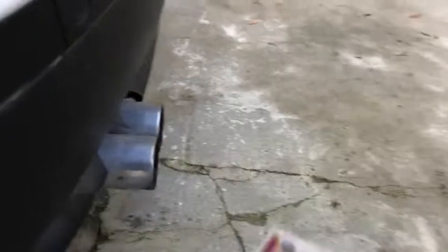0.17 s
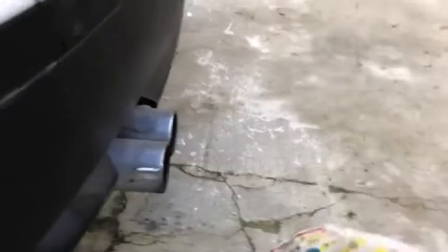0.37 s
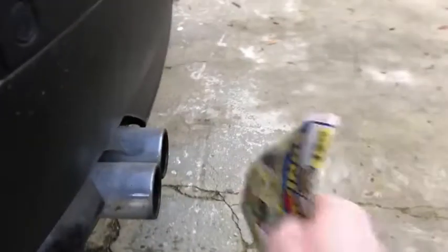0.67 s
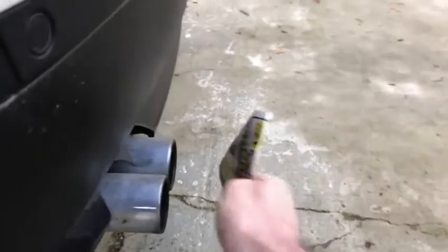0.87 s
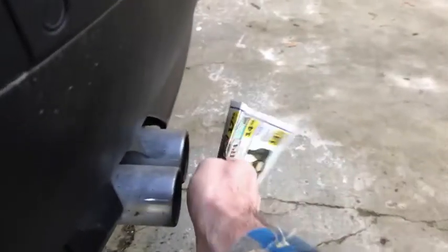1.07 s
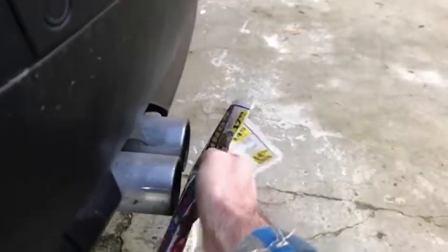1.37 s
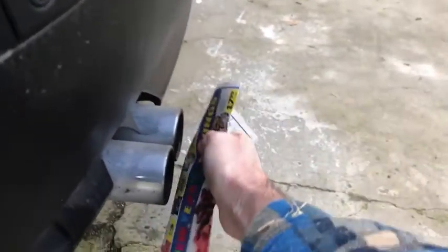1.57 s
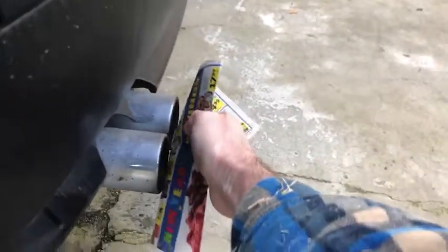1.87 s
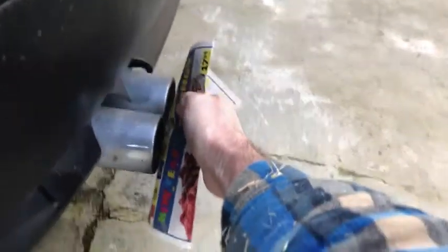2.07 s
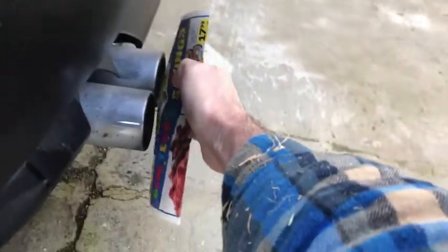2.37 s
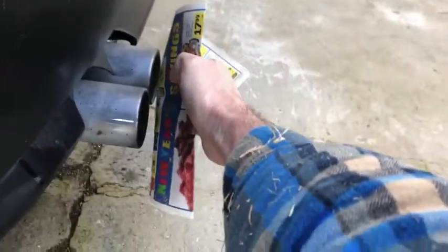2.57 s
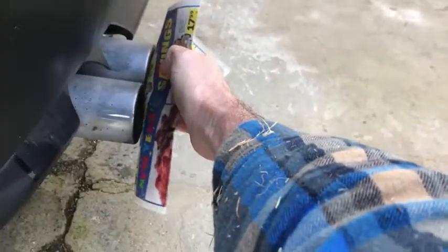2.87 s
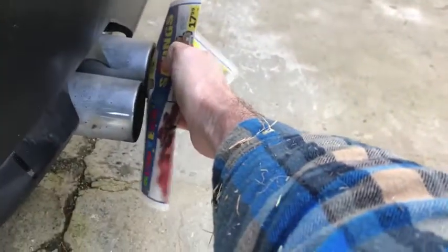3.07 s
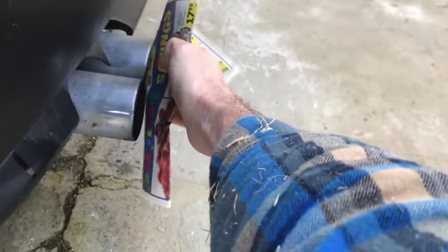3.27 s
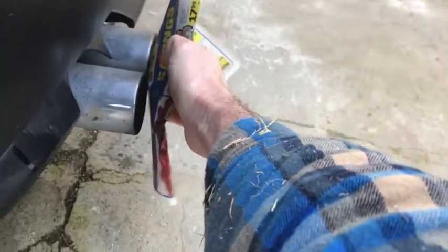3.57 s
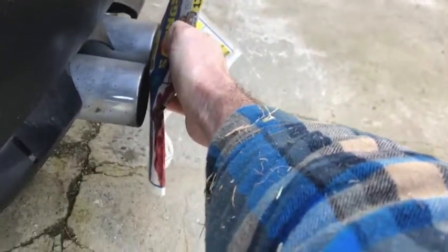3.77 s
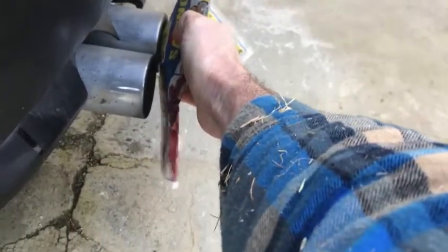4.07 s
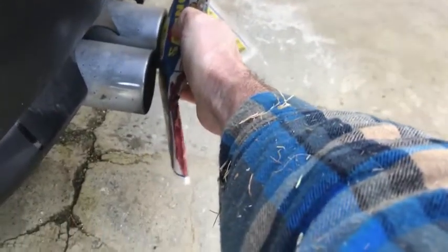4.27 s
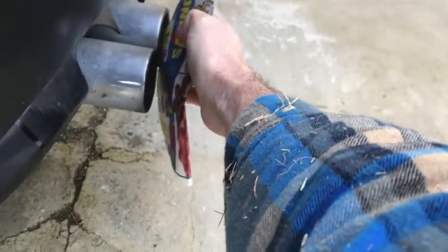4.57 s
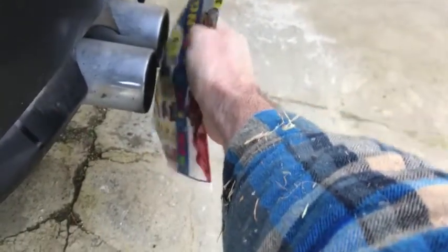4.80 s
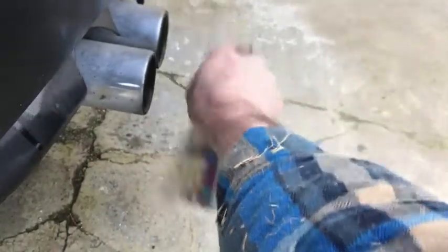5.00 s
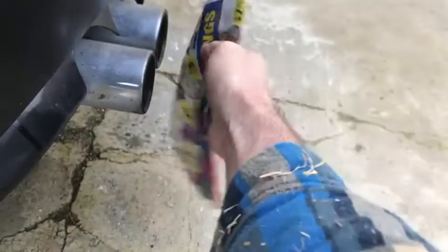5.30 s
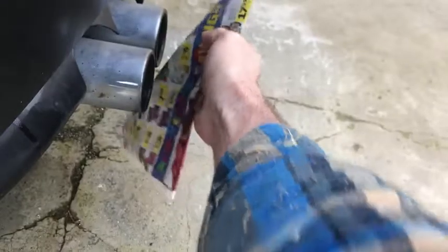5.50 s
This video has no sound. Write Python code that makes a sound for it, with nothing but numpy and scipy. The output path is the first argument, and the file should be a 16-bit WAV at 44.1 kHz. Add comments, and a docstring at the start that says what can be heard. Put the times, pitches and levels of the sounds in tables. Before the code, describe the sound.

Deep, uneven exhaust pulsing from an idling car, with soft misfire thumps and a paper flyer snapping, swishing and faintly crinkling.

```python
"""A V12 idles outdoors at about 690 rpm, close to its tailpipes: firing pulses ring the exhaust in a
deep, lumpy throb, with a rush of gas and faint valve clatter. Right away a folded paper flyer is
snatched up with sharp taps and a swish. All along, one cylinder misfires now and then and sucks gas
back with a bump. Held to the pipes, the flyer crinkles at about two seconds and again near the end,
by which time the microphone has closed in and the gas is a little louder."""
import sys
import numpy as np
from scipy import signal
from scipy.fft import rfft, irfft, next_fast_len
from scipy.io import wavfile

SR = 44100
rng = np.random.default_rng(int(sys.argv[2]) if len(sys.argv) > 2 else 0)


def to_wav(s):
    """Save 16-bit WAV."""
    ch = np.atleast_2d(s).T  # columns
    pcm = np.round(np.clip(ch, -1, 1) * 32767)  # PCM
    wavfile.write(sys.argv[1], SR, pcm.astype(np.int16))


N = 248724

# The exhaust's deep standing waves. Each row: pitch in Hz, width in Hz, relative level in dB.
PIPE_MODES = [(55.6, 5.6, 36.5), (74.2, 26.5, 38), (122.4, 13, 21.5), (150.4, 29, 35.5), (201.2, 3.6, 29),
              (257, 81, 11.5)]
# Polarity at the outlet. Each entry: the sign of one of those standing waves.
PIPE_POLARITY = [1, 1, 1, -1, 1, -1]
# Misfires. Each row: rough time in seconds, suction as a multiple of one firing pulse.
MISFIRES = [(.15, 2.9), (.67, 1.9), (1.01, 2), (1.53, 2.2), (1.7, 1.5), (1.88, .9), (2.4, 2.1), (2.57, 1),
            (3.09, 3), (3.44, 3), (3.96, 2.4), (4.13, 2), (4.82, 1.2)]
# Hollow upper standing waves. Each row: pitch in Hz, width in Hz, relative level in dB.
HOLLOW_MODES = [(273.4, 39, 3.5), (317, 24, 0), (402, 26, -2), (483, 47, -12.5), (544.3, 4.2, 4.5),
                (666, 37, 2), (786, 48, -1.5), (810, 82, -0.5), (920, 37, -0.5)]
# Each exhaust runner's chuff. Each row: place in firings, pitch in Hz, width in Hz, relative level in dB.
RUNNER_CHUFFS = [(1.9, 640, 30, -14.5), (2.7, 510, 31, -15.5), (3.5, 690, 90, -7), (3.8, 835, 29, -8.5),
                 (4.6, 545, 16, -12.5), (6.0, 402, 21, -9.5), (6.4, 865, 28, -22), (7.5, 590, 12, -15),
                 (9.4, 850, 120, -15.5), (9.6, 745, 26, -10), (10.2, 550, 43, -13), (11.6, 750, 130, -13.5)]
# Turbulent hiss at the outlet. Each row: frequency in Hz, relative level in dB.
JET_SPECTRUM = [(150, -24), (450, -9), (750, 1.5), (1050, -7), (1400, -14), (2000, -17), (2450, -12.5),
                (2750, -20.5), (3500, -15.5), (4300, -18.5), (4800, -36), (7000, -33.5), (15000, -37)]
# Metal rung by the valves. Each row: pitch in Hz, width in Hz, relative level in dB.
METAL_MODES = [(1026, 72, -3), (1218, 28, 4), (1567, 50, 2), (1980, 60, -7.5), (2249, 16, 4),
               (3087, 130, -7.5), (3640, 98, -11), (4274, 150, -11)]
# Valve gear ticks. Each row: place in firings, pitch in Hz, width in Hz, relative level in dB.
VALVE_TICKS = [(1.8, 1580, 65, -67), (2.5, 4900, 120, -74.5), (3.3, 4270, 58, -72), (4.7, 3090, 85, -70.5),
               (5.7, 1700, 86, -67.5), (9.6, 1035, 40, -62.5), (9.6, 3060, 42, -68.5),
               (9.7, 2228, 63, -67.5), (11.6, 1550, 51, -66), (11.7, 2600, 44, -71.5)]
# The flyer popping taut. Each row: start in seconds, relative level in dB.
PAPER_TAPS = [(0.034, -27.5), (.055, -22), (0.135, -23), (0.153, -25.5), (.169, -24.5), (0.207, -37.5),
              (0.583, -37.5)]
# The body of the folded sheet. Each row: pitch in Hz, width in Hz, relative level in dB.
SHEET_MODES = [(1125, 560, 0), (1360, 420, 3), (2080, 880, -8), (4040, 2900, -22.5)]
# Creases giving way. Each row: start in seconds, relative levels of body and crisp edge in dB.
CREASES = [(0.0925, -34.5, -43), (0.2368, -29.5, -43.5), (0.2803, -39.5, -40.5), (1.4316, -44, -48.5),
           (1.9843, -32, -51.5), (2.0272, -28.5, -47), (2.0413, -28, -53), (2.0859, -36, -57),
           (2.1028, -33.5, -58), (2.157, -37, -61), (2.372, -40.5, -51), (2.4022, -31.5, -59),
           (5.1591, -32, -52)]
# Paper sliding on paper. Each row: peak time in seconds, level in dB, swell and fade in seconds.
PAPER_STROKES = [(0.038, -45, 0.15, 0.024), (.16, -40.5, 0.047, 0.048), (.23, -49, 0.027, 0.037),
                 (0.336, -48.5, 0.071, 0.066), (.472, -45.5, .02, 0.033), (.543, -32, .021, .013),
                 (1.15, -62.5, .2, .06), (2.048, -53.5, 0.047, .08), (2.391, -53.5, 0.085, 0.027),
                 (4.88, -55.5, .08, .06), (5.075, -52.5, .035, 0.013), (5.21, -51, .022, .02),
                 (5.351, -58.5, 0.064, 0.026), (5.551, -53.5, .03, .07)]
# The colour of that swish. Each row: frequency in Hz, relative level in dB.
SWISH_SPECTRUM = [(400, -27), (900, -5), (1300, 0), (2800, -4.5), (4500, -9), (7500, -17), (9500, -14.5),
                  (11000, -17), (15500, -16.5)]
# The bed of background hiss. Each row: frequency in Hz, relative level in dB.
AIR_SPECTRUM = [(20, 12.5), (200, 0.5), (1500, 3), (4900, 3), (5400, 4), (6200, 1.5), (7700, -4), (9800, 1),
                (10700, -4), (12400, 4), (14200, -3.5), (15700, -6)]

CYLINDERS, BAD_CYLINDER = 12, 9
TIME = np.arange(N) / SR


def throb(times, sizes, level_db=-0.24, outlet_hz=40, muffler_hz=300, low_cut_hz=32):
    """Firing pulses ring the pipe; its mouth radiates little deep bass and the muffler takes the treble."""
    def exhaust(f):
        pipe = sum(sign * amp(db) * resonance(f, hz, width)
                   for (hz, width, db), sign in zip(PIPE_MODES, PIPE_POLARITY))
        outlet = 1j * f / (1j * f + outlet_hz)
        muffler = 1 / (1 + 1j * f / muffler_hz)
        low_cut = f ** 4 / np.hypot(f ** 4, low_cut_hz ** 4)
        return pipe * (outlet * muffler) ** 2 * low_cut
    return amp(level_db) * filtered(pulses(times, sizes) + gulps(times), exhaust)


def firings(lope_db=2, lope_s=.0003, sway_s=.00048, latest_place=.83, size_scatter=.11, jitter_s=.0002):
    """Pulse times and sizes. The lope: each crank turn has three strong and late, three weak and early."""
    per_turn = CYLINDERS // 2
    fired = np.cumsum(crank_rpm() / 60 * per_turn) / SR - .32
    index = np.arange(int(fired[-1]) + 1)
    lope = np.where((index + 1) % per_turn < per_turn // 2, 1, -1)
    sway = np.cos(2 * np.pi * (index - latest_place) / CYLINDERS)  # drags and rushes once a cycle
    size_noise, time_noise = rng.standard_normal((len(index), 2)).T
    times = np.interp(index, fired, TIME) + lope_s * lope + sway_s * sway + jitter_s * time_noise
    return times, amp(lope_db * lope) * (1 + size_scatter * size_noise)


def crank_rpm(idle_rpm=696.2, sag_rpm=1.76, recover_s=.8):
    """Each misfire costs a little speed, which the governor wins back."""
    sag = sum((TIME > start) * np.exp(-abs(TIME - start) / recover_s) for start, _ in MISFIRES)
    return idle_rpm - sag_rpm * sag


def gulps(times, soften_hz=170, echo_s=.0122, echo_share=.29, rebound_s=.0295, rebound_share=.22):
    """A misfire sucks gas back in a soft bump that echoes down the pipe; a harder push follows."""
    bad_firings = times[BAD_CYLINDER::CYLINDERS]
    rough_times, strength = np.transpose(MISFIRES)
    when = bad_firings[np.argmin(abs(bad_firings - rough_times[:, None]), axis=1)]
    suction = pulses(when, strength) + echo_share * pulses(when + echo_s, strength)
    rebound = rebound_share * pulses(when + rebound_s, strength)
    return filtered(rebound - suction, lambda f: np.exp(-(f / soften_hz) ** 2))


def gas(times, sizes, level_db=-46, jet_db=-51.5, closer_db=3.5, approach_s=4.7):
    """Puffs of gas sound the hollow pipe modes, chuff in the runners and hiss at the outlet."""
    def rush():
        return puffs(times, abs(sizes), decay_s=.0054) + rng.standard_normal(N)
    drive = unit(pulses(times, sizes)) + unit(rush())
    hollow = amp(-4) * unit(rung(drive, HOLLOW_MODES))
    chuffs = amp(-4.5) * cycle_rings(times, RUNNER_CHUFFS, scatter_db=3, rough=.5)
    jet = amp(jet_db) * coloured(rush(), JET_SPECTRUM)
    approach = np.minimum(TIME / approach_s, 1)  # the microphone closes in
    return amp(level_db + closer_db * approach) * (hollow + chuffs) + jet


def spit(times, place=9.9, level_db=-58, scatter_db=1.9):
    """A sharp puff of gas each time the bad cylinder comes round."""
    when = once_a_cycle(times, place)
    sizes = amp(scatter_db * rng.standard_normal(len(when)))
    return amp(level_db) * coloured(puffs(when, sizes, decay_s=.0073), JET_SPECTRUM)


def valves(times, clatter_db=-56.5, scatter_db=1):
    """Valves close in step with the crank and keep the metal ringing; a few tick out on their own."""
    forces = amp(scatter_db * rng.standard_normal(len(times)))
    clatter = puffs(times, forces, decay_s=.0083)
    ticks = amp(-2.5) * cycle_rings(times, VALVE_TICKS, scatter_db=4.5, rough=.34)
    return amp(clatter_db) * unit(rung(clatter, METAL_MODES)) + ticks


def taps(drive_db=31, flutter_db=-24, knock_hz=1500, knock_width_hz=2200):
    """The sheet snaps taut with a hollow tap and flutters for an instant."""
    starts, db = np.transpose(PAPER_TAPS)
    sizes = amp(db + drive_db)
    snap = pulses(starts, sizes) + amp(flutter_db) * puffs(starts, sizes, decay_s=.0038)
    knock = filtered(snap, lambda f: resonance(f, knock_hz, knock_width_hz))
    return rung(knock, SHEET_MODES)


def crinkles(body_hz=2000, body_width_hz=3000, edge_hz=7000):
    """A crease gives way with a papery crack and a crisp edge."""
    starts, body_db, edge_db = np.transpose(CREASES)
    crack = puffs(starts, amp(body_db + 2), decay_s=.0033)
    fizz = puffs(starts, amp(edge_db + 1), decay_s=.0058)
    body = filtered(crack, lambda f: resonance(f, body_hz, body_width_hz) ** 2)
    edge = filtered(fizz, lambda f: 1j * f / (1j * f + edge_hz))
    return body + edge


def swish(catches_per_s=900, spread_db=3, smooth=.85):
    """Sliding paper hisses, grainy with catching fibres, and peaks where each stroke is fastest."""
    position, chance = rng.random((int(catches_per_s * N / SR), 2)).T
    sizes = amp(-spread_db * np.log(chance + .01))  # many small catches, a few big ones
    catches = puffs(position * N / SR, sizes, decay_s=.0003)
    friction = unit(catches) + smooth * rng.standard_normal(N)
    strokes = [amp(db) * np.exp(-np.maximum((peak - TIME) / swell, (TIME - peak) / fade))
               for peak, db, swell, fade in PAPER_STROKES]
    envelope = np.sqrt(sum(stroke ** 2 for stroke in strokes))
    return envelope * coloured(friction, SWISH_SPECTRUM)


def air(level_db=-63):
    """A faint, steady bed of hiss."""
    return amp(level_db) * coloured(rng.standard_normal(N), AIR_SPECTRUM)


def cycle_rings(times, rings, scatter_db, rough, rattle_s=.086):
    """Soft-edged rings, each driven by a blow and a short rattle once an engine cycle."""
    out = np.zeros(N)
    for place, hz, width, db in rings:
        when = once_a_cycle(times, place)
        sizes = amp(scatter_db * rng.standard_normal(len(times))[:len(when)])
        drive = unit(pulses(when, sizes)) + rough * unit(puffs(when, sizes, rattle_s))
        mode = np.concatenate(signal.iirpeak(hz, hz / width, SR))
        out += amp(db) * unit(signal.sosfilt([mode, mode], drive))  # two stages soften the attack
    return out


def once_a_cycle(times, place):
    """The moments when the engine cycle passes one place, counted in firings."""
    index = np.arange(len(times))
    return np.interp(np.arange(place, index[-1], CYLINDERS), index, times)


def pulses(times, sizes):
    """One impulse at each time."""
    samples = np.clip(np.round(times * SR).astype(int), 0, N)
    return np.bincount(samples, sizes, N + 1)[:N]


def puffs(times, sizes, decay_s):
    """Noise bursts with a hard attack and a dying tail."""
    envelope = signal.lfilter([1], [1, -np.exp(-1 / (SR * decay_s))], pulses(times, sizes) + 1e-20)
    return envelope * rng.standard_normal(N)


def resonance(f, hz, width):
    """Response of one damped mode."""
    return 1j * f * width / (hz * hz - f * f + 1j * f * width)


def rung(x, modes):
    """Play x through a body whose modes alternate in polarity."""
    return filtered(x, lambda f: sum((-1) ** k * amp(db) * resonance(f, hz, width)
                                     for k, (hz, width, db) in enumerate(modes)))


def coloured(x, points):
    """EQ x through (Hz, dB) points on a log frequency axis, at rms 1."""
    hz, db = np.transpose(points)
    return unit(filtered(x, lambda f: amp(np.interp(np.log(f + 1), np.log(hz), db))))


def filtered(x, response):
    """Shape x with a complex frequency response."""
    size = next_fast_len(N + SR // 2, True)
    return irfft(rfft(x, size) * response(np.fft.rfftfreq(size, 1 / SR)), size)[:N]


def amp(db):
    """Decibels to gain."""
    return 10 ** (np.asarray(db) / 20)


def unit(x):
    """Scale to rms 1."""
    return x / np.sqrt(np.mean(x ** 2) + 1e-20)


def scene():
    """Engine and paper, close and dry over the hiss, in mono."""
    times, sizes = firings()
    engine = throb(times, sizes) + gas(times, sizes) + spit(times) + valves(times)
    paper = taps() + crinkles() + swish()
    return (engine + paper + air())[None]


def record(dry, top_hz=15750):
    """A brick-wall low-pass takes off the very top."""
    return np.array([filtered(channel, lambda f: f < top_hz) for channel in dry])


dry = scene()
out = record(dry)
to_wav(out)
```